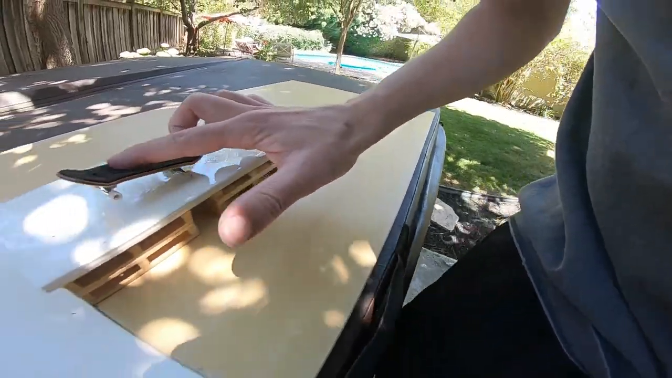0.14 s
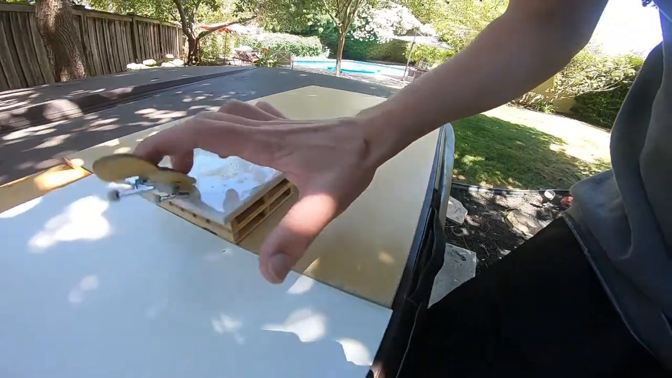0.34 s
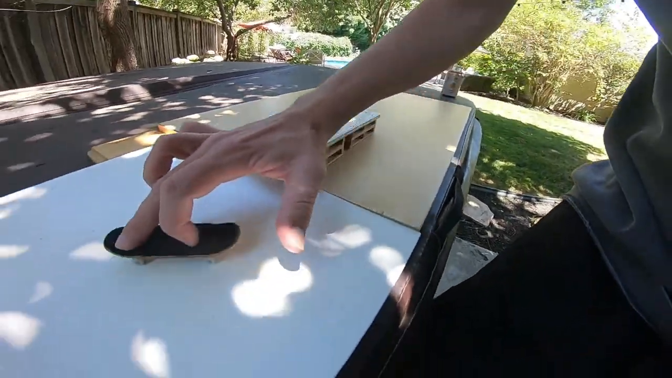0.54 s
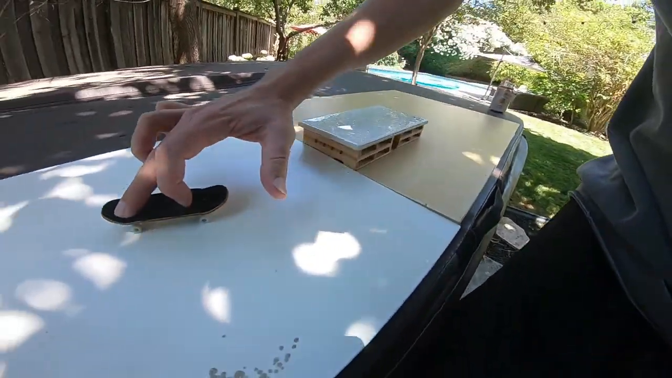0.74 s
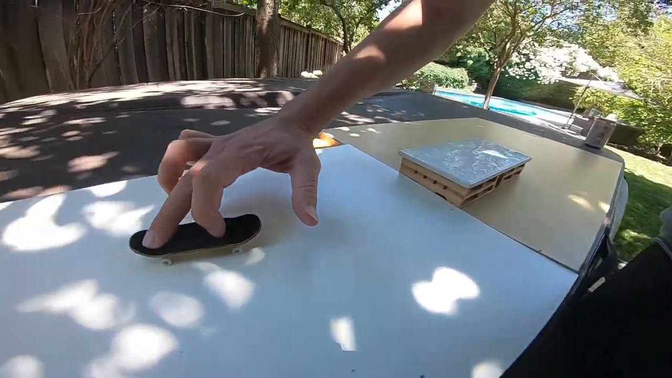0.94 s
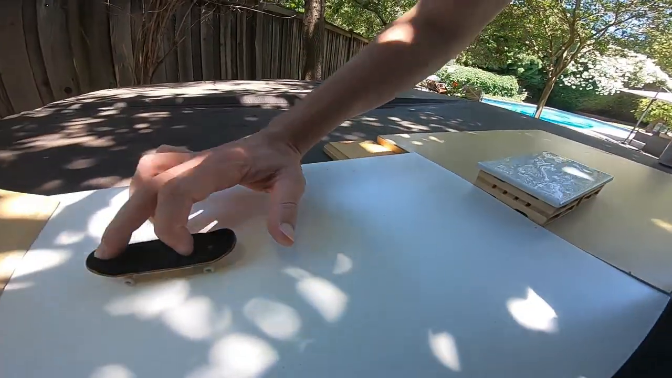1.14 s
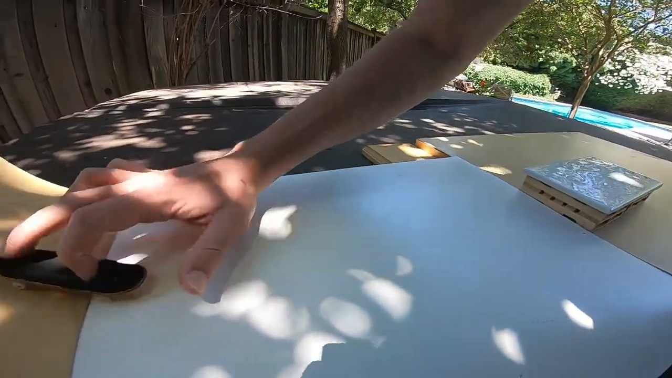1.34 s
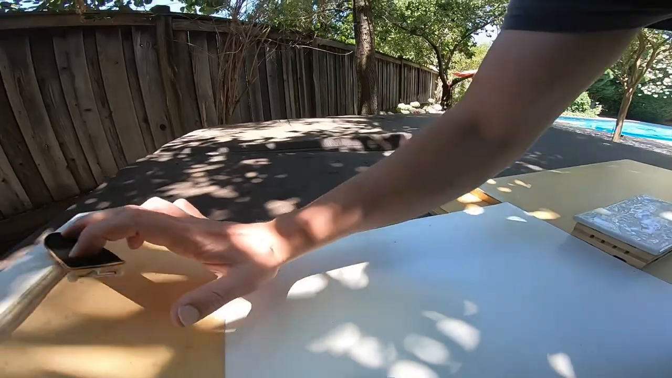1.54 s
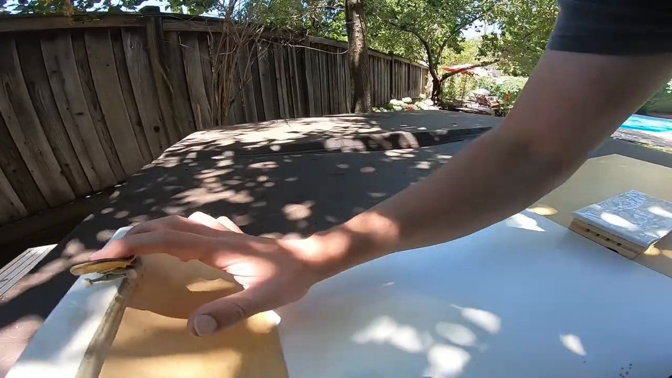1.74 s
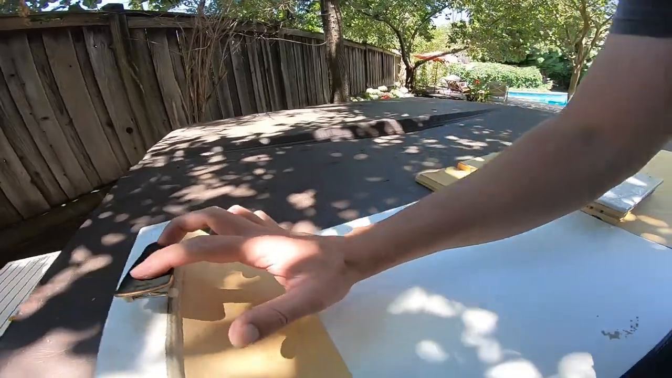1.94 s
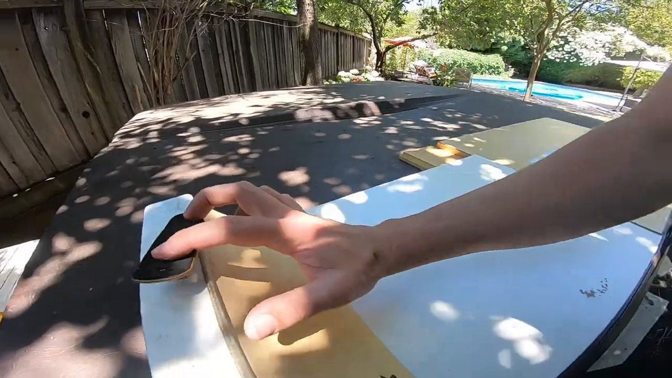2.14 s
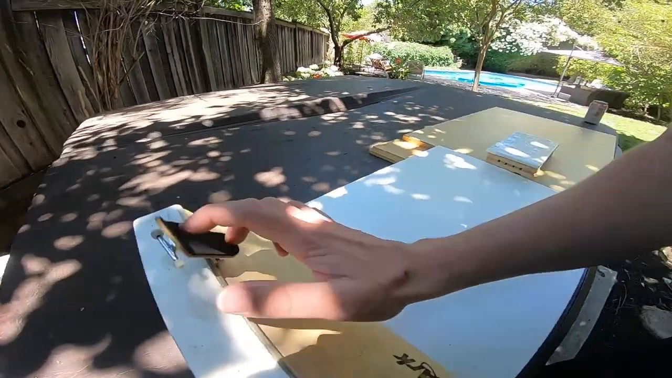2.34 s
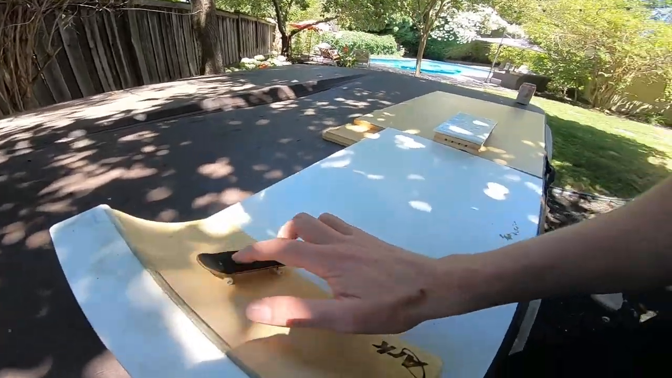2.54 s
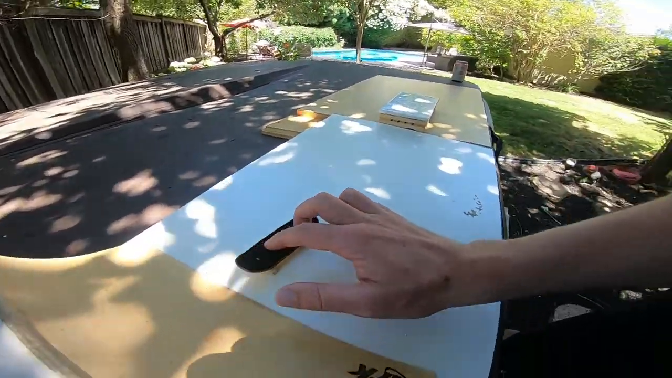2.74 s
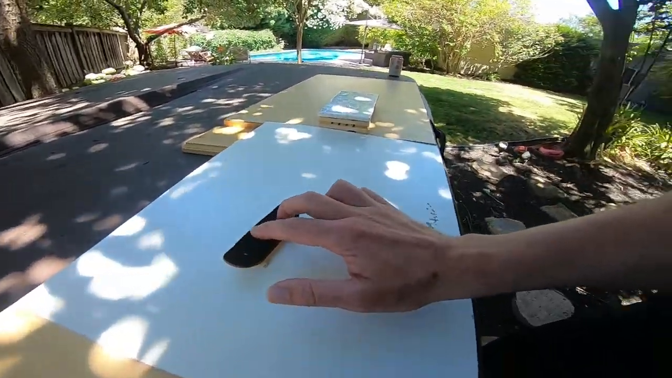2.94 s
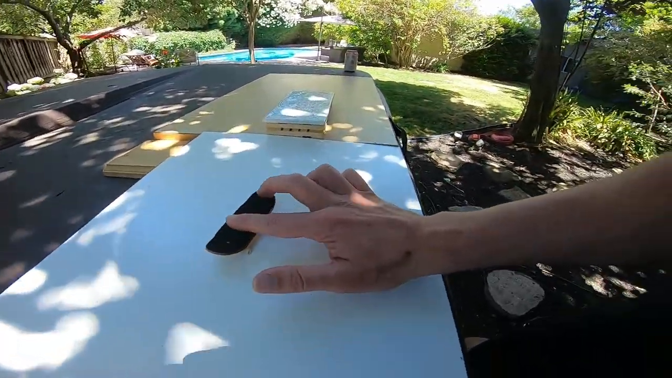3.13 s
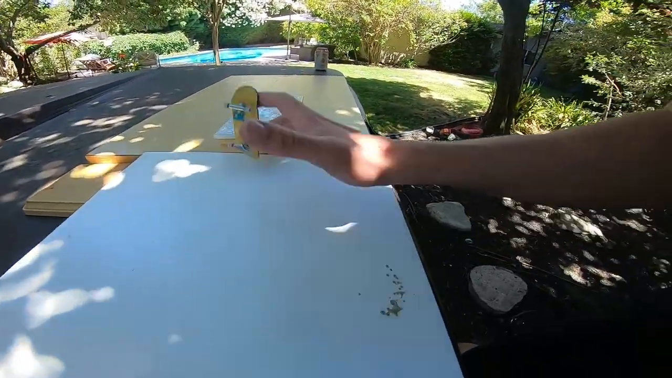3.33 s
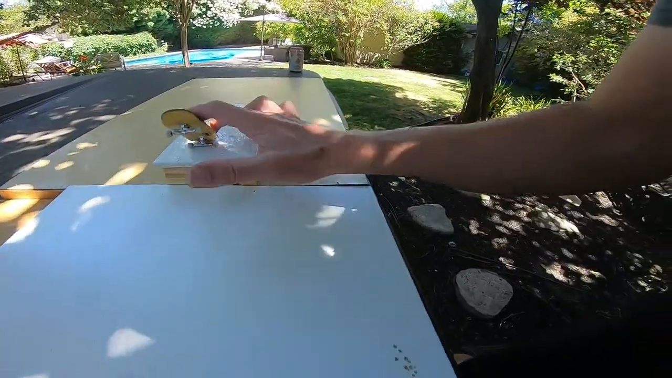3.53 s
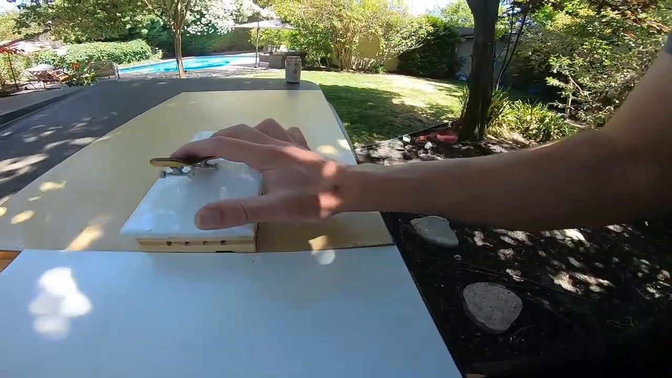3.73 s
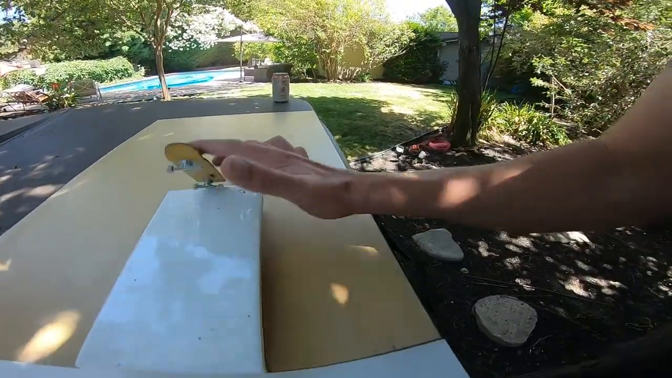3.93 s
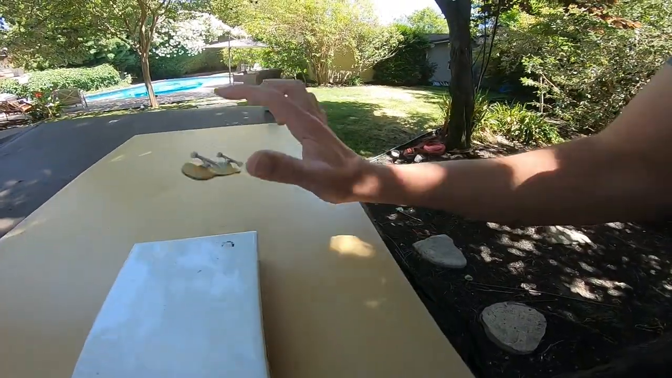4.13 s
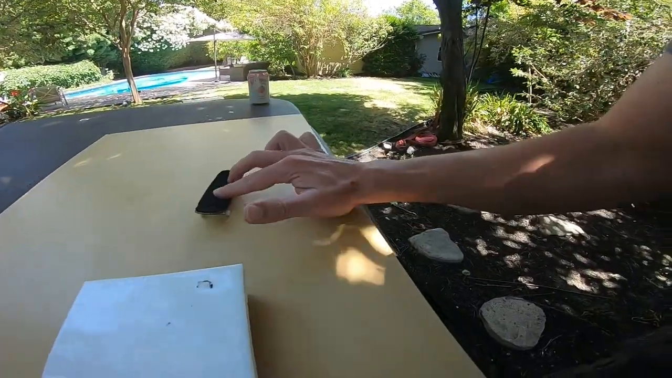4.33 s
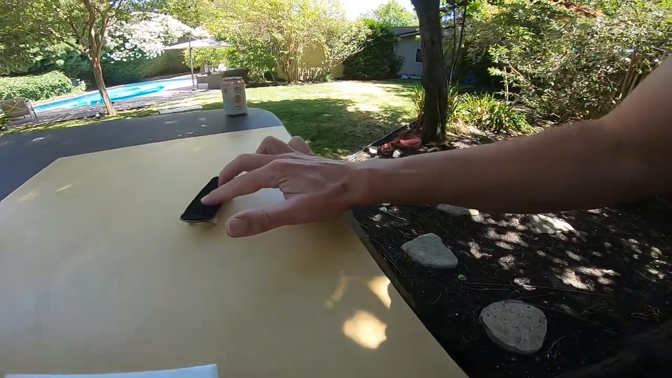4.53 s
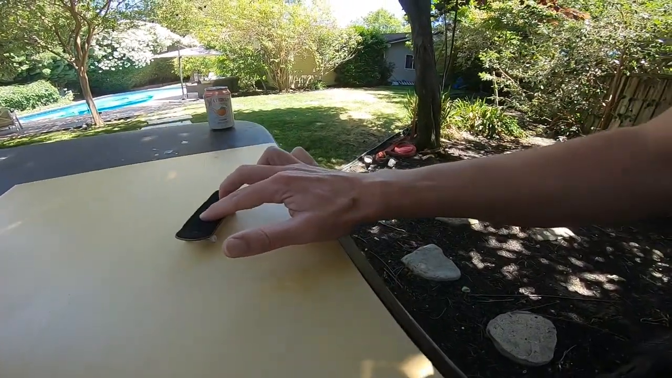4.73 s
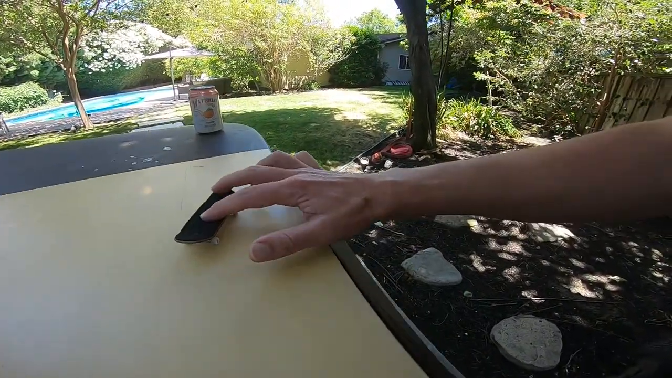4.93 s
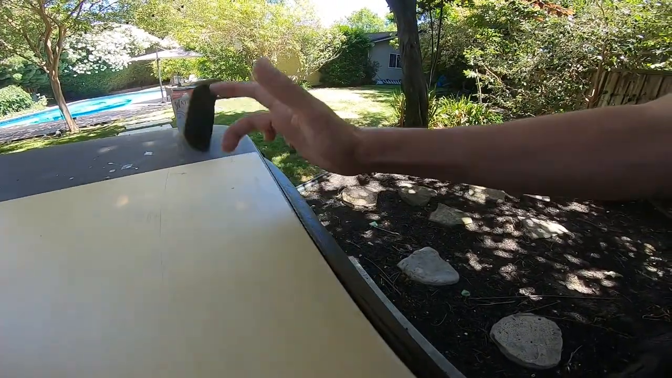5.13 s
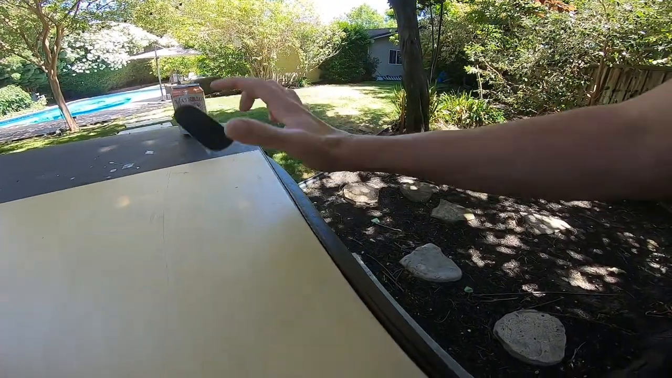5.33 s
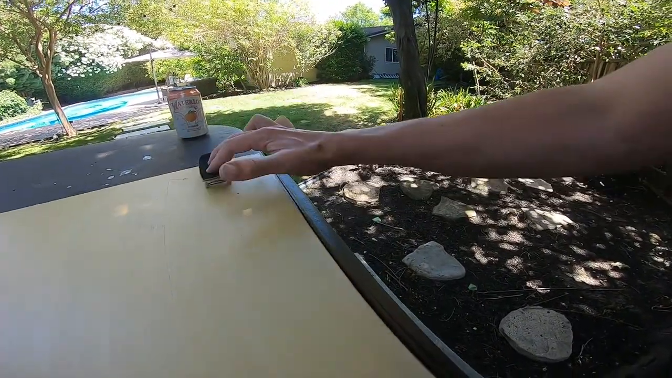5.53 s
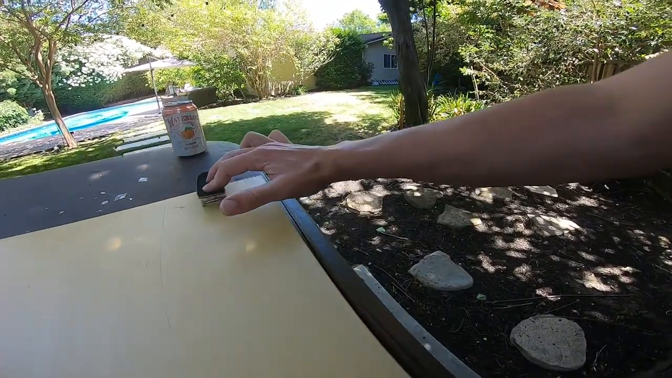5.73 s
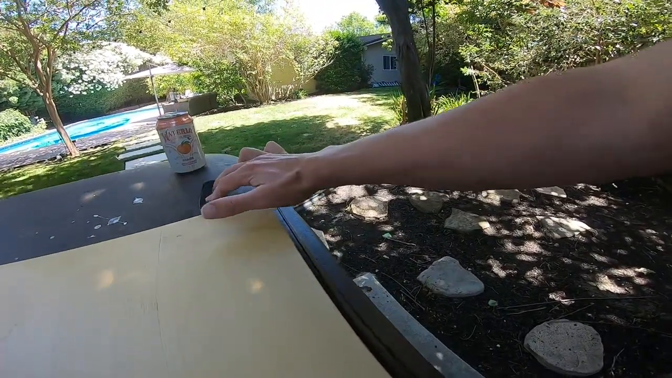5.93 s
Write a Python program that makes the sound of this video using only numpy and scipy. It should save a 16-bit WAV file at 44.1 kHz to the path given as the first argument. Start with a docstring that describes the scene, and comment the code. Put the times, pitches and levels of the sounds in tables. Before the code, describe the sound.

A small wooden fingerboard scrapes along the edge of a box, lands with a sharp clack and rolls up a ramp and back with rattling knocks. It pops into another thin metallic grind, then snaps into two flips, each ending in a clattering landing on the table. A few dull thuds follow as a hand catches it. The sound is close and straight ahead, in a yard with a faint echo and a distant machine hum.

```python
"""A wooden fingerboard grinds off a small box, lands, and rolls up a ramp and back.
It pops onto the box, grinds again, then is flipped twice on a patio table; lifted wheels whirr on.
Blows and rolling shake three parts: the panel underneath, the deck and the metal trucks.
Throughout, the yard gives a faint echo over the hum of a distant machine."""
import sys
import numpy as np
from scipy import signal
from scipy.fft import rfft, irfft, next_fast_len
from scipy.io import wavfile
from scipy.ndimage import uniform_filter1d

SR = 44100
rng = np.random.default_rng(int(sys.argv[2]) if len(sys.argv) > 2 else 0)


def wav_record(signal):
    """Record a signal, one row per channel, as 16-bit PCM in the file named by sys.argv[1]."""
    frames = np.transpose(np.atleast_2d(signal))
    bounded = np.clip(frames, -1, 1)
    # unit amplitude maps onto the largest positive 16-bit level
    quanta = np.round(bounded * 32767).astype(np.int16)
    wavfile.write(sys.argv[1], SR, quanta)


N = 267761
TIME = np.arange(N) / SR

# Modes of the board. Each row: frequency in Hz, width in Hz, level in dB.
DECK_MODES = [(1160, 123, 6.5), (1415, 260, 7.5), (1687, 84, 6), (1870, 97, 8.5), (2160, 48, 7),
              (2315, 55, -6.5), (2767, 51, -0.5), (3280, 69, -0.5)]
TRUCK_MODES = [(3820, 140, 4.5), (3670, 29, 26), (4040, 330, 29.5), (4600, 73, 8.5), (5100, 80, 9),
               (5820, 160, -24), (6400, 220, -15.5), (6340, 140, -3)]
# The tail is pressed down, drags and snaps on the surface. Each row: snap time in seconds,
# panel, deck, trucks, crack and drag levels in dB, drag swell in seconds per 20 dB.
TAIL_POPS = [(2.28, -45.5, -46, -47, -44, -54, 0.037), (3.288, -21, -28, -27.5, -26, -38.5, 0.14),
             (3.9524, -36.5, -32, -30.5, -28.5, -43.5, 0.15), (5.0774, -23.5, -30, -29, -25.5, -42, 0.079),
             (5.925, -23.5, -26, -37.5, -39.5, -51.5, .1)]


def undb(db):
    """Decibels to gain."""
    return 10 ** (np.asarray(db) / 20)


def unit(x, size=None):
    """Scale to rms 1 over the first `size` samples."""
    return x / np.sqrt(np.mean(x[:size] ** 2) + 1e-20)


def colour(x, points):
    """Minimum-phase filter through (Hz, dB) points."""
    hz, db = np.transpose(points)
    f = np.maximum(np.fft.rfftfreq(8192, 1 / SR), 1)
    cepstrum = irfft(np.log(undb(np.interp(np.log(f), np.log(hz), db))))
    cepstrum[1:4096] *= 2
    cepstrum[4097:] = 0
    return signal.fftconvolve(x, irfft(np.exp(rfft(cepstrum))))[:len(x)]


def ring(x, modes, scatter_db=0, detune=0):
    """Drive damped modes; scatter and detune stand for the varying place of contact."""
    size = next_fast_len(len(x) + 4096)
    f = np.maximum(np.fft.rfftfreq(size, 1 / SR), 1)
    response = 0
    for (hz, width_hz, db), (level_draw, pitch_draw) in zip(modes, rng.standard_normal((len(modes), 2))):
        hz = hz * (1 + detune * pitch_draw)
        gain = undb(db + scatter_db * level_draw)
        response = response + gain / (1 + 1j * (f * f - hz * hz) / (f * width_hz))
    # a part radiates little outside the range of its modes
    edges_hz = [.72 * modes[0][0], 1.2 * modes[-1][0]]
    _, skirt = signal.freqz(*signal.butter(2, edges_hz, "band", fs=SR), worN=f, fs=SR)
    return irfft(rfft(x, size) * response * skirt, size)[:len(x)]


def walk(rate_hz):
    """Smooth random wander with a spread near 1."""
    hold = max(int(SR / rate_hz), 1)
    steps = np.repeat(rng.standard_normal(N // hold + 1), hold)
    return 1.14 * uniform_filter1d(uniform_filter1d(steps, hold), hold)[:N]


def gate(start_s, stop_s):
    """1 between two times, with short ramps."""
    return np.clip((TIME - start_s) / 0.0077, 0, 1) * np.clip((stop_s - TIME) / 0.0067, 0, 1)


def swell(peak_s, rise_db_per_s, fall_db_per_s):
    """Gain that climbs to 1 at peak_s, then falls."""
    return undb(np.minimum(rise_db_per_s * (TIME - peak_s), fall_db_per_s * (peak_s - TIME)))


def background(noise_db=-46.5):
    """A distant motor hums in the soft, low noise of the neighbourhood."""
    # Motor tones and noise spectrum. Each row: frequency in Hz, level in dB (relative for the noise).
    motor_tones = [(119.9, -47.5), (157, -54)]
    noise_spectrum = [(15, -36.5), (25, -22), (59, -15), (92, -17), (102, -18), (123, -9.5), (190, -8.5),
                      (249, -10.5), (394, -18.5), (734, -27), (1650, -35.5), (2300, -44.5), (3100, -55),
                      (4610, -46), (7000, -65.5), (16000, -84.5)]
    hum = 0
    for hz, db in motor_tones:
        amplitude = np.sqrt(2) * undb(db + 0.38 * walk(6.3))
        cycles = np.cumsum(hz + 0.28 * walk(4.3)) / SR
        hum += amplitude * np.sin(2 * np.pi * cycles)
    noise_gain = undb(noise_db + .6 * walk(3))
    return hum + noise_gain * unit(colour(rng.standard_normal(N), noise_spectrum))


def grit(spread_db):
    """Dense tiny bumps of uneven size."""
    size = np.minimum(rng.exponential(size=N), 4)
    return rng.standard_normal(N) * undb(spread_db * size)


def plywood(x, t60_s=0.018, ring_db=-2):
    """Vibration runs to and fro in the thin sheet, adding many close, fixed resonances."""
    t = np.arange(SR // 8) / SR
    response = rng.standard_normal(len(t)) * undb(-60 * t / t60_s)
    response *= undb(ring_db) / np.linalg.norm(response)
    response[0] += 1
    return unit(signal.fftconvolve(x, response)[:N])


def shaking(hiss_floor_db=-71, roll_trucks_db=-7, drag_trucks_db=-5):
    """Gains of panel, deck and trucks for pushes, skids, held hisses and tail drags; powers add."""
    # Hand pushes. Each row: start, fastest moment and stop in seconds, panel level in dB,
    # rise and fall in dB per second, rattle in dB relative to the panel.
    pushes = [(0.5, 1.355, 1.6, -30, 30.5, 108, -14), (1.108, 1.157, 1.25, -30.5, 20, 100, -33),
              (2.44, 2.497, 2.54, -29.5, 203, 220, -13), (2.518, 2.594, 2.73, -28, 166, 217, -15.5),
              (2.62, 2.672, 2.98, -35.5, 60, 12.5, -17.5), (2.975, 3.046, 3.247, -35, 90, 24, -12),
              (4.273, 4.507, 4.87, -47, 37, 26, -18), (4.88, 5.022, 5.08, -44.5, 77, 25, -11.5),
              (5.81, 5.88, 6.5, -50, 106, 103, -7.5)]
    # Skids after landings and in turns. Each row: peak time in seconds,
    # swell and fade in seconds per 20 dB, deck and trucks levels in dB.
    skids = [(0.328, 0.066, 0.033, -42, -44), (0.367, .02, 0.0086, -50, -45),
             (0.49, 0.027, 0.11, -27, -26.5), (0.723, .012, 0.077, -45.5, -48.5),
             (0.83, 0.21, 0.26, -51, -54), (1.34, 0.32, 0.19, -43.5, -44),
             (2.288, 0.016, 0.024, -38, -41.5), (2.431, 0.063, 0.063, -38, -35.5),
             (2.476, 0.079, .04, -35.5, -39.5), (2.595, 0.053, 0.086, -40.5, -53),
             (2.7, 0.064, 0.044, -41.5, -45.5), (3.548, 0.03, 0.042, -48, -39.5),
             (4.255, 0.069, 0.061, -39.5, -38.5), (5.425, 0.034, 0.032, -27, -34),
             (5.47, 0.018, 0.11, -76, -48), (5.88, 0.059, .05, -50, -75)]
    # Trucks slide along an edge, or lifted wheels spin freely. Each row: start and stop in seconds,
    # deck and trucks levels in dB, fade in dB per second.
    held_hisses = [(0, .37, -55, -60.5, 26), (1.551, 2.0, -71, -64, 27), (3.594, 3.94, -69, -68.5, 10)]
    panel, deck = [], []
    trucks = [np.full(N, undb(hiss_floor_db))]  # a faint, steady high hiss throughout
    for start_s, fastest_s, stop_s, db, rise_db_per_s, fall_db_per_s, rattle_db in pushes:
        roll = gate(start_s, stop_s) * swell(fastest_s, rise_db_per_s, fall_db_per_s) * undb(db)
        panel.append(roll)
        deck.append(roll * undb(rattle_db))
        trucks.append(roll * undb(rattle_db + roll_trucks_db))
    rubs = []
    for peak_s, rise_s, fade_s, deck_db, trucks_db in skids:
        rubs.append((swell(peak_s, 20 / rise_s, 20 / fade_s), deck_db, trucks_db))
    for start_s, stop_s, deck_db, trucks_db, fade_db_per_s in held_hisses:
        fade = undb(-fade_db_per_s * (TIME - start_s))
        rubs.append((gate(start_s, stop_s) * fade, deck_db, trucks_db))
    for snap_s, *_, drag_db, rise_s in TAIL_POPS:
        drag = gate(0, snap_s) * swell(snap_s, 20 / rise_s, 0)
        rubs.append((drag, drag_db, drag_db + drag_trucks_db))
    for envelope, deck_db, trucks_db in rubs:
        deck.append(envelope * undb(deck_db))
        trucks.append(envelope * undb(trucks_db))
    return [np.sqrt(sum(gain ** 2 for gain in part)) for part in (panel, deck, trucks)]


def slide_and_roll(turn_hz=45, throb_db=-1.5, waver_db=1.0):
    """The board rubs and rolls over wood grain; wheels are out of round and finger pressure wavers."""
    # Panel modes under the wheels, before the pitch shift.
    # Each row: frequency in Hz, width in Hz, level in dB.
    panel_modes = [(433, 400, -23), (702, 150, -12), (782, 72, -3), (881.5, 33, 3), (1018, 130, -6.5)]
    # Panel pitch follows the board's place. Each row: time in seconds, main resonance in Hz.
    panel_pitch = [(.8, 893.5), (1.36, 848), (1.46, 638), (2.47, 800), (2.53, 901), (2.9, 905.4),
                   (3.1, 834), (4.4, 965.4), (5.05, 935)]
    # Rasp of grip tape, wood and urethane; scrape of the trucks. Each row: frequency in Hz, level in dB.
    rasp_spectrum = [(600, -22), (1100, -8.5), (1500, -2.5), (2400, -0.5), (3400, -2.5), (4300, -4.5),
                     (5500, -13), (8000, -44), (16000, -51.5)]
    scrape_spectrum = [(1500, 2), (3000, 6), (4300, 13.5), (5300, 15.5), (7000, 1), (8500, -13),
                       (11000, -35.5), (12500, -11), (15500, -23.5)]
    # Axles and deck sing under friction. Each row: start and stop in seconds,
    # frequency and width in Hz, level in dB relative to the trucks.
    singing = [(0, 0.385, 3070, 45, 2.5), (0, 0.38, 3595, 70, 4), (0.563, 0.641, 4130, 110, 6.5),
               (0.652, 0.766, 4140, 160, 5.5), (0.76, 1.143, 3380, 100, -1.5),
               (0.649, 1.116, 1757, 55, 4.5), (2.395, 2.52, 4900, 130, 4), (2.393, 2.601, 2898, 130, 3.5),
               (2.427, 2.52, 3970, 200, 2.5), (2.56, 2.77, 1740, 100, 3.5), (3.535, 3.94, 3760, 182.4, 0),
               (3.589, 3.944, 1582, 69.6, 4), (3.59, 3.853, 2170, 55.83, -1), (4.286, 5.07, 3814, 130, 2),
               (4.29, 5.42, 4040, 150, -3.5), (1.572, 1.898, 4937, 840, -2)]
    panel_gain, deck_gain, truck_gain = shaking()
    turns = np.cumsum(turn_hz * (1 + .25 * walk(5))) / SR
    pressure = undb(throb_db * np.sin(2 * np.pi * turns) + waver_db * walk(90))
    # all panel modes glide together
    main_hz = panel_modes[3][0]
    read_index = np.cumsum(np.interp(TIME, *np.transpose(panel_pitch)) / main_hz)
    rumble = unit(ring(grit(spread_db=0.5), panel_modes))
    panel = np.interp(read_index, np.arange(N), rumble, period=N)
    deck = undb(-4) * plywood(ring(grit(spread_db=-3), DECK_MODES))
    deck += undb(-2) * plywood(colour(grit(spread_db=4), rasp_spectrum))
    trucks = undb(-6) * plywood(ring(grit(spread_db=5), TRUCK_MODES))
    trucks += undb(-4) * plywood(colour(grit(spread_db=7), scrape_spectrum))
    friction = grit(spread_db=1)
    for start_s, stop_s, hz, width_hz, db in singing:
        trucks += gate(start_s, stop_s) * undb(db) * unit(ring(friction, [(hz, width_hz, 0)]))
    rattle = undb(1.8 * walk(260))  # loose hardware, in quick uneven bursts
    return pressure * (panel_gain * panel + rattle * (deck_gain * deck + truck_gain * trucks))


def contact(t, chatter, t60_s):
    """One sharp push, then loose parts chatter briefly."""
    push = chatter * rng.standard_normal(len(t)) * undb(-60 * t / t60_s)
    push[0] += 1
    return push


def blows(scatter_db=3.5, detune=.015):
    """Each blow rings panel, deck and trucks, with a crack of hard contact."""
    # Wheels and trucks land or hit an edge; last, the hand catches the board with dull thuds.
    # Each row: time in seconds, panel, deck, trucks and crack levels in dB.
    knocks = [(0.011, -51, -60, -44, -57), (0.4497, -22.5, -22, -29, -36), (0.4575, -21, -21.5, -31, -30),
              (0.4817, -21.5, -29, -25, -22.5), (0.496, -31, -41, -30, -28.5),
              (1.111, -27.5, -50, -68, -72), (1.3324, -22.5, -27, -33.5, -49),
              (1.5112, -63, -41.5, -40, -44), (1.582, -47, -46, -35.5, -45), (2.376, -44, -35.5, -39, -53),
              (2.405, -33.5, -35, -21.5, -47), (2.43, -39, -40, -42, -38), (2.4745, -30.5, -46, -49, -49),
              (2.482, -35, -43, -32.5, -48), (2.512, -35, -40, -45, -56), (2.615, -22.5, -29.5, -41, -39),
              (2.6245, -30, -41, -40, -43), (2.7086, -24, -30, -38, -35.5),
              (2.7203, -27, -29.5, -34, -38.5), (3.538, -35.5, -30, -26.5, -26),
              (3.5422, -26, -35, -25.5, -32.5), (4.2133, -16.5, -21, -31.5, -43),
              (4.2236, -16.5, -21.5, -30, -36.5), (4.251, -18, -26, -26, -41),
              (4.2569, -21, -33, -43, -28.5), (4.2601, -18, -30, -26.5, -32.5),
              (4.308, -47, -44, -44.5, -61), (5.4058, -22.5, -21, -26.5, -28),
              (5.412, -22, -19.5, -44, -46), (5.43, -21.5, -27, -20.5, -24),
              (5.435, -23.5, -18.5, -24, -27.5), (5.757, -25.5, -45, -62, -63),
              (5.773, -25.5, -33, -53, -64), (5.7916, -21, -35.5, -58, -59)]
    # Modes of each surface. Each row: frequency in Hz, width in Hz, level in dB.
    ramp = [(173, 51, 14.5), (310, 58, 9.5), (423, 110, 11.5), (544, 78, 9), (667, 61, 5.5), (872, 90, 6.5),
            (1067, 37, 9)]
    ramp_curve = [(178, 26, -3), (690, 84, -2), (797, 20, -6), (848, 70, 9.5), (1140, 150, -22)]
    ramp_end = [(382, 42, 10), (640, 74, 3.5), (1130, 110, -15)]
    box = [(70, 30, 4), (205, 24, 7), (610, 21, 2), (820, 360, -7.5), (1290, 190, 1.5)]
    table = [(175, 30, -1), (306.4, 12, 0), (392, 72, -1), (454.4, 63, -0.5), (714, 120, 0), (822, 35, 0.5),
             (1015, 85, 0), (1134, 60, -10)]
    table_edge = [(54.5, 39, -5), (168, 160, -0.5), (230, 49, 3.5), (294.5, 18, 13), (387, 71, 2.5),
                  (606, 58, 3), (825, 54, -2.5), (1234, 300, 1)]
    # Hard contact. Each row: frequency in Hz, level in dB.
    crack_spectrum = [(1000, -18.5), (2500, -10.5), (4500, 11), (6500, 12.5), (8000, -5.5), (11000, -47),
                      (12800, -10.5), (15500, -25)]
    surfaces = [(0, ramp), (1, ramp_curve), (3, ramp_end), (3.4, box), (4.1, table), (4.8, table_edge)]
    out = np.zeros(N + SR)
    t = np.arange(SR // 5) / SR
    attack_samples = SR // 200
    for time_s, *levels_db in TAIL_POPS + knocks:
        surface = [modes for from_s, modes in surfaces if from_s <= time_s][-1]
        panel = ring(contact(t, chatter=0.071, t60_s=0.043), surface, scatter_db / 2, detune / 2)
        deck = ring(contact(t, chatter=0.26, t60_s=0.016), DECK_MODES, scatter_db, detune / 2)
        trucks = ring(contact(t, chatter=0.7, t60_s=0.022), TRUCK_MODES, scatter_db, detune)
        crack = colour(contact(t, chatter=0.28, t60_s=0.022), crack_spectrum)
        onset = int(time_s * SR)
        for part, db in zip((panel, deck, trucks, crack), levels_db):
            out[onset:onset + len(t)] += undb(db) * unit(part, attack_samples)
    return out[:N]


def scuff(start_s=.112, db=-64, t60_s=0.17):
    """A faint, bright brush of hiss during the first slide."""
    hiss = unit(colour(rng.standard_normal(N), [(4000, -20), (7500, -6), (11000, -5), (15500, -9)]))
    return hiss * gate(start_s, 1) * undb(db - 60 * np.maximum(TIME - start_s, 0) / t60_s)


def wheel_spin(width_hz=70):
    """Bearings keep up a thin, rough whirr while their wheels turn freely."""
    # Free spins. Each row: start and stop in seconds, pitch in Hz, level in dB, fall in dB per second.
    spins = [(3.291, 3.537, 8510, -81, 33), (3.288, 3.54, 6070, -76, 28), (3.29, 3.55, 5830, -74, 12),
             (4.26, 5.40, 7140, -79, 24), (5.08, 5.41, 7620, -83, 19), (5.449, 6.07, 7380, -84, 10)]
    out = np.zeros(N)
    for start_s, stop_s, hz, db, fall_db_per_s in spins:
        whirr = unit(ring(rng.standard_normal(N), [(hz, width_hz, 0)]))
        out += gate(start_s, stop_s) * undb(db - fall_db_per_s * np.maximum(TIME - start_s, 0)) * whirr
    return out


def yard_echo(x, near_t60_s=0.074, far_t60_s=.38):
    """Quick scatter from table and body, then a thin tail from fence and garden."""
    t = np.arange(SR) / SR
    decays = undb(-60 * t / np.array([[near_t60_s], [far_t60_s]]))
    fade_in = np.clip(t / 0.0048 - .5, 0, 1)
    near, far = rng.standard_normal((2, SR)) * decays * fade_in
    response = undb(-21) * near / np.linalg.norm(near) + undb(-28) * far / np.linalg.norm(far)
    echo = signal.fftconvolve(x, response)[:N]
    return colour(echo, [(150, 8.5), (700, 2.0), (2000, -5.5), (5000, 1.5), (14000, 5.5)])


def scene():
    """The board is straight ahead; only the treble of its echo spreads to the sides."""
    board = blows() + slide_and_roll() + wheel_spin() + scuff()
    mid = board + yard_echo(board) + background()
    side_spectrum = [(500, -50), (2500, -30), (5000, -14), (8000, -5.5), (12500, 13.5), (16000, 21)]
    side = colour(yard_echo(board), side_spectrum)
    return np.array([mid + side, mid - side])


def record(dry):
    """Steep low-pass at 16 kHz."""
    return signal.sosfilt(signal.ellip(8, .2, 70, 16000, fs=SR, output="sos"), dry)


dry = scene()
out = record(dry)
wav_record(out)
```